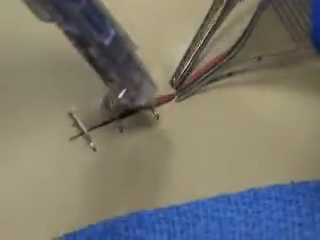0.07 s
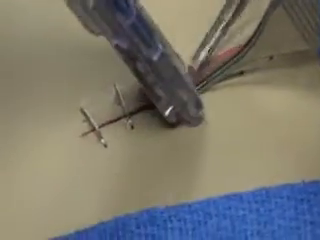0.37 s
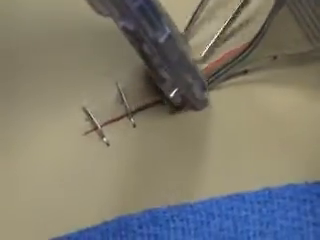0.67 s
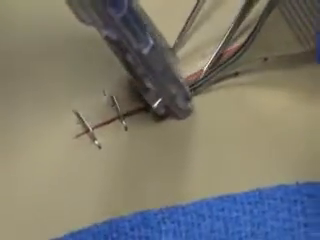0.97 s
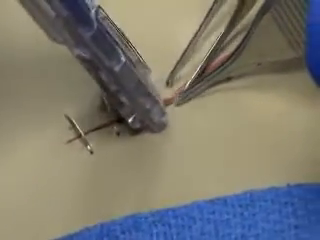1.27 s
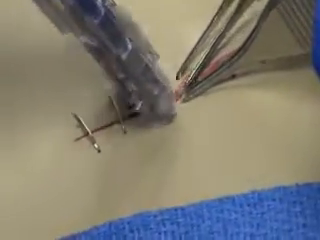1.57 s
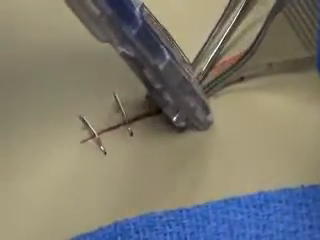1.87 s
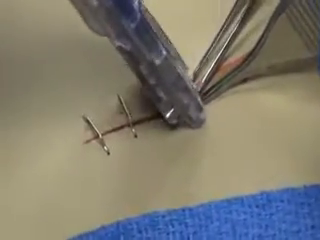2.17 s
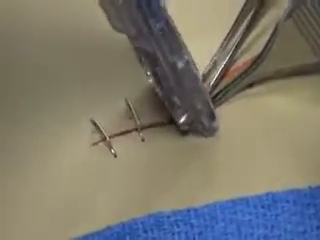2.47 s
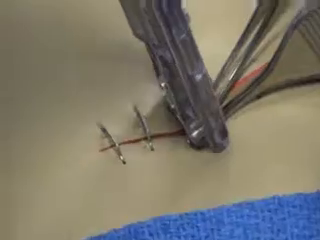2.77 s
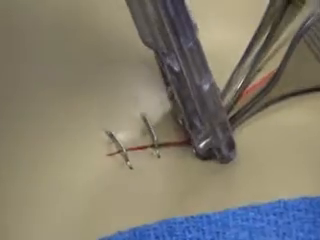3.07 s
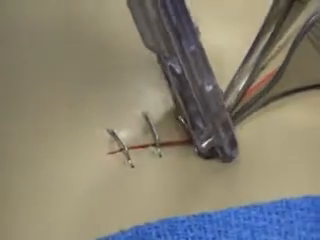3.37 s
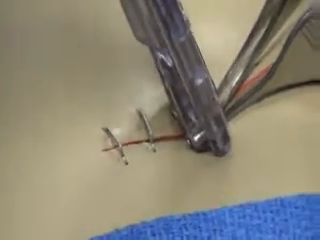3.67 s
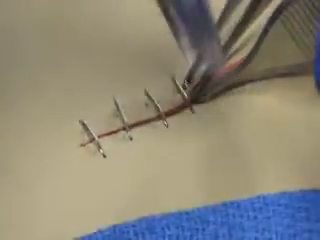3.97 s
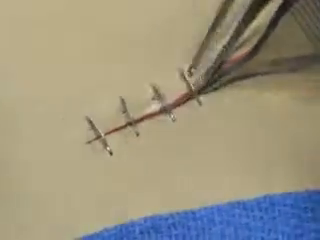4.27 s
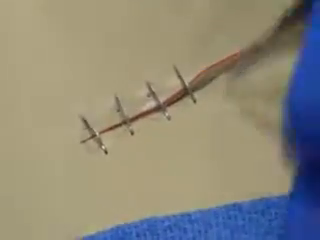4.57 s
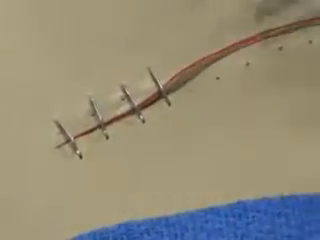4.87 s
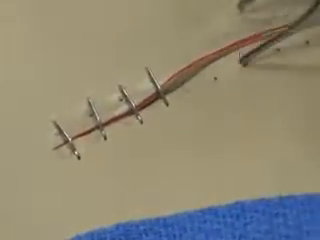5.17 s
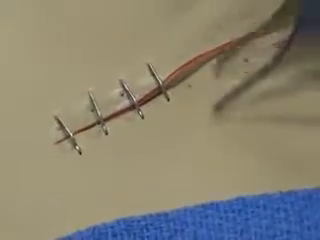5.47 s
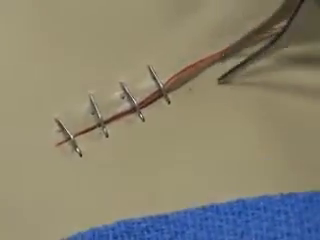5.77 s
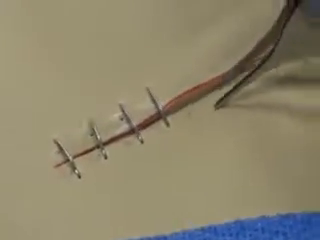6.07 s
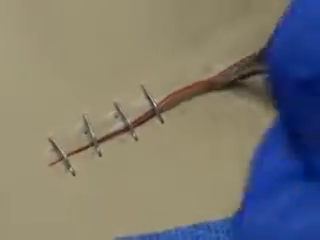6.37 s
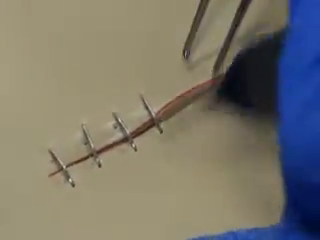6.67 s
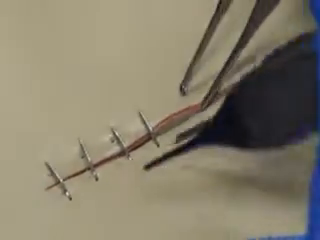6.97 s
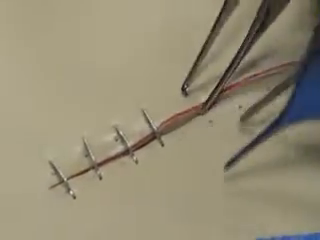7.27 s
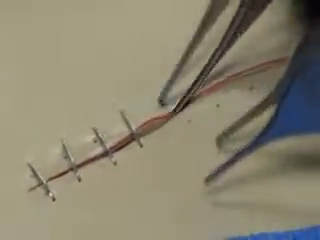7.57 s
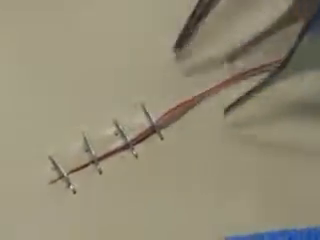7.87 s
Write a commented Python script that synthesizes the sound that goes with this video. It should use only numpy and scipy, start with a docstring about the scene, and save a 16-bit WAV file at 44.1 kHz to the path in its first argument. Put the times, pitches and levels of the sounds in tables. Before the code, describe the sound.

Close, crisp ratcheting clicks from one squeeze of a surgical stapler, followed by a single bright forceps snap, over soft ventilation noise.

```python
"""A skin stapler is squeezed once on a practice pad, close to the microphone, in a small ventilated room.
Its pawl snaps over ratchet teeth, the staple is formed, and the sprung handle slides back to its stop;
each impact excites the resonances of the plastic housing. Steel forceps tick, snap shut once and ring
in their normal modes. Gloves brush the pad with a hiss of friction, and a lens motor briefly drives a
camera's body into vibration. Under it all lie resonant air noise and the camera's steady hum."""
import sys
import numpy as np
from scipy import signal
from scipy.fft import rfft, irfft
from scipy.io import wavfile
from scipy.ndimage import uniform_filter1d

SR = 44100
rng = np.random.default_rng(int(sys.argv[2]) if len(sys.argv) > 2 else 0)


def digitize_waveform(pressure):
    """Quantize a signal to 16-bit integers and store it at the path in sys.argv[1].

    Rows of a 2-D input are taken as channels; values are limited to [-1, 1].
    """
    field = np.atleast_2d(pressure).T
    bounded = np.clip(field, -1, 1)
    quanta = np.round(bounded * 32767).astype(np.int16)
    wavfile.write(sys.argv[1], SR, quanta)


N = 348831
TIME, FREQS = np.arange(N) / SR, np.maximum(np.arange(N // 2 + 1) * SR / N, 1)
CUTOFF_HZ = 12600
ANTIPHASE = np.array([[1], [-1]])   # left, right


def from_db(db):
    """Amplitude ratio of a level in decibels."""
    return 10 ** (np.asarray(db) / 20)


def rms_one(x):
    """Normalisation to unit rms."""
    return x / np.sqrt(np.mean(x ** 2) + 1e-20)


def at_hz(points, hz):
    """Interpolation on a logarithmic frequency axis."""
    f, value = np.transpose(points)
    return np.interp(np.log(hz), np.log(f), value)


def noise(colour_db):
    """Spectral shaping of white noise, at unit rms."""
    return rms_one(irfft(rfft(rng.standard_normal(N)) * from_db(colour_db), N))


def add(out, s, sound):
    """Superposition of a short sound at time s."""
    i = int(s * SR)
    out[i:i + len(sound)] += sound[:N - i]


def gate(start, stop, attack_s, release_s):
    """Trapezoidal envelope: it rises from the start and falls after the stop."""
    return np.clip((TIME - start) / attack_s, 0, 1) * np.clip(1 - (TIME - stop) / release_s, 0, 1)


def causal(gain):
    """Causality: the minimum-phase response with these gains never precedes the blow."""
    cepstrum = irfft(np.log(gain))
    half = len(cepstrum) // 2
    return np.exp(rfft(np.r_[cepstrum[:1], 2 * cepstrum[1:half], np.zeros(half)]))


def chatter(envelope, passes=4):
    """Broadband excitation: tiny hard contacts under an envelope have a nearly flat spectrum."""
    burst = rng.standard_normal(len(envelope))
    for _ in range(passes):
        spectrum = rfft(envelope * np.sign(burst))
        burst = irfft(spectrum / (np.abs(spectrum) + 1e-12))
    return envelope * np.sign(burst)


def snap(body, focus, db, decay_ms, low_db, top_db, ring_hz=None, bounce_ms=0,
         bounce=0, rise_ms=.5, creep_db=-22, creep_ms=2.6, size=2048):
    """Stick-slip: a catch creeps, slips and chatters on a body; focus below 1 flattens the colour."""
    ms = np.arange(size) / SR * 1000 - 6   # time from the slip
    after = np.maximum(ms, 0)
    force = (1 - np.exp(-(after / rise_ms) ** 2)) * np.exp(-after / decay_ms)
    force = force / force.max() + from_db(creep_db) * np.exp(-np.abs(ms) / creep_ms)
    hz = np.maximum(np.arange(size // 2 + 1) * SR / size, 1)
    tilt = at_hz([(3000, low_db), (4800, 0), (8000, 0.0038), (10200, top_db)], hz)
    ring = 6.5 / (1 + ((hz - ring_hz) / 190) ** 2) if ring_hz else 0   # the contact point favours a pitch
    response = causal((body(hz) * from_db(tilt + ring)) ** focus)
    comb = 1 + bounce * np.exp(-2j * np.pi * hz * bounce_ms / 1000)
    spectrum = rfft(chatter(force)) * response * comb
    energy = np.sum(irfft(spectrum * (hz < CUTOFF_HZ)) ** 2)
    return from_db(db) * irfft(spectrum) * np.sqrt(.006 * SR / energy)   # db is the rms over 6 ms


def lay_snaps(rows, body, focus=1, **contact):
    """Superposition of snaps: each row is the time of the slip, then snap's arguments from db on."""
    out = np.zeros(N)
    for s, *shape in rows:
        add(out, s - .006, snap(body, focus, *shape, **contact))
    return out


def struck(hits, modes, attack_s=.0003, size=8192):
    """Free vibration: each hit sets all the damped modes of a steel part ringing."""
    t, out = np.arange(size) / SR, np.zeros(N)
    for s, db in hits:
        ringing = sum(from_db(db + level - 60 * t / t60) * np.sin(2 * np.pi * (hz * t + rng.random()))
                      for hz, level, t60 in modes)
        add(out, s, ringing * (1 - np.exp(-t / attack_s)))
    return out


# air noise and microphone hiss: f/Hz, relative level/dB
AIR_SPECTRUM = [(20, -24), (45, -9.5), (95, -7), (160, -0.5), (310, -8.5), (470, -7), (820, -16),
                (1200, -16), (1480, -28), (1900, -27), (2400, -32), (4500, -33.5), (9000, -35),
                (13000, -36)]
# duct and room resonances, plus the camera stabiliser's hum near 1.7 kHz: f/Hz, width/Hz, lift/dB
BACKGROUND_BANDS = [(147.7, 13.4, 6), (238, 26, 3.5), (271.7, 26, 4), (366.5, 16, 5.5), (556, 36, -4.5),
                    (599, 17, 3.5), (672, 48, 8.5), (733.3, 29, 9), (1110, 76, 4), (1666, 166, 6.5)]
# stereo width of the background: f/Hz, side re mid/dB
AIR_SIDE = [(40, -9), (90, -16), (180, -19), (350, -22.5), (700, -21), (1100, -31), (1450, -23), (1700, -5),
            (2100, -31), (4000, -38), (7000, -16.5), (11000, -27.5)]
# its balance: f/Hz, left re right/dB
AIR_BALANCE = [(40, -2), (90, -5), (180, -2), (350, -0.7), (700, -1.5), (1400, 1.5), (3000, 0)]

def air_and_hum(level_db=-52.5):
    """Stationary noise: air coloured by duct and room resonances, plus the camera's steady hum."""
    bands_db = sum(db * np.exp2(-(2 * (FREQS - hz) / width) ** 2) for hz, width, db in BACKGROUND_BANDS)
    mid, side = rfft(rng.standard_normal((2, N))) * from_db(at_hz(AIR_SPECTRUM, FREQS) + bands_db)
    pair = mid + ANTIPHASE * side * from_db(at_hz(AIR_SIDE, FREQS))
    balance = from_db(ANTIPHASE * at_hz(AIR_BALANCE, FREQS) / 2)   # the bass leans to the right
    return from_db(level_db) * rms_one(irfft(pair * balance, N))


# spectrum of a light contact: f/Hz, relative level/dB
TICK_SPECTRUM = [(300, -25), (1800, -13), (3000, -6), (4500, 0), (6000, -2.5), (8000, -1.5), (11500, 1)]

def ticks(rows, decay_ms=2.2, low_db=0.5):
    """Brief contacts radiate broadband clicks; the rows are t/s, level/dB, treble/dB."""
    snaps = [(s, db, decay_ms, low_db, top_db) for s, db, top_db in rows]
    return lay_snaps(snaps, lambda hz: from_db(at_hz(TICK_SPECTRUM, hz)))


# light touches of the tools: t/s, level/dB, treble/dB
TOUCHES = [(.422, -54.5, 3.5), (1.272, -65, -8), (2.801, -60.5, -3), (4.579, -54, -6), (5.0654, -58, 1),
           (6.3356, -62, -2)]

def tool_touches():
    """Light impacts make the tools tick."""
    return ticks(TOUCHES)


def faint_touches(per_s=.8, level_db=-70, top_db=-3):
    """A Poisson process: the handled tools tick, barely audibly, at random moments."""
    times = TIME[rng.random(N) < per_s / SR]
    return ticks([(s, level_db, top_db) for s in times if s > .01])


# slips of the return spring: t/s, ping level/dB, tick level/dB
SPRING_SLIPS = [(2.7894, -38.5, -64), (3.7495, -40, -53), (3.7937, -41, -58), (3.8573, -36, -57)]
# its modes: f/Hz, relative level/dB, T60/s
SPRING_MODES = [(3060, -4, 0.018), (3220, -15, 0.066), (2850, -10, 0.025)]

def return_spring(top_db=-12):
    """Impulse excitation: the spring shifts on its seat, ticks and rings in its modes."""
    pings = struck([(s, ping_db) for s, ping_db, _ in SPRING_SLIPS], SPRING_MODES)
    return pings + ticks([(s, tick_db, top_db) for s, _, tick_db in SPRING_SLIPS])


# resonances of the stapler's housing: f/Hz, width/Hz, level/dB
HOUSING_MODES = [(3250, 220, -5.5), (4840, 310, -1.5), (5660, 60, -2.5), (6400, 190, -6), (7100, 1050, -2),
                 (7800, 110, 0), (8120, 91, -2), (9300, 240, -7), (9970, 110, 1), (10330, 130, -7),
                 (10800, 470, 2.5), (11560, 130, 0), (11940, 240, -0.5), (12440, 170, -2)]
# its broad response beneath them: f/Hz, level/dB
SHELL_RESPONSE = [(40, -40), (200, -16.5), (500, -20.5), (1100, -18), (1500, -25), (1850, -12), (2300, -16),
                  (3000, -10.5), (3900, -10), (6000, -6.5), (8000, -3.5), (8800, -12), (10500, -18),
                  (13000, -11)]

def housing(hz, vary_db=0.5, detune=0.013):
    """Frequency response of the housing: each contact and grip excites and shifts its modes anew."""
    power = from_db(at_hz(SHELL_RESPONSE, hz)) ** 2
    for centre, width, db in HOUSING_MODES:
        shift, strength = rng.standard_normal(2)
        offset = (hz - centre * (1 + detune * shift)) / (width / 2)
        power = power + from_db(db + vary_db * strength) ** 2 / (1 + offset ** 2 / 2) ** 2
    return np.sqrt(power)


# the pawl drops over each tooth: t/s, level/dB, ring f/Hz, bounce delay/ms
RATCHET_TEETH = [(3.0267, -30, 5000, 1.1), (3.049, -29, 6500, 1.068), (3.0661, -27, 6000, 0.88),
                 (3.081, -25.5, 5580, 0.74), (3.1198, -24.5, 4870, .892), (3.2216, -26, 4800, .67),
                 (3.3244, -25.5, 7350, 0.496), (3.408, -25, 5860, 1.25), (3.4597, -26.3, 10600, 0.51)]

def ratchet(focus, low_db=-1, bounce=0.46):
    """Comb filtering: each snap of the pawl interferes with its own bounce and sounds hollow."""
    # the load grows tooth by tooth, so the snaps get shorter and brighter
    decays_ms = np.linspace(2.8, 1.6, len(RATCHET_TEETH))
    tops_db = np.linspace(-1, 2.5, len(RATCHET_TEETH))
    rows = [(s, db, decay, low_db, top, ring_hz, bounce_ms)
            for (s, db, ring_hz, bounce_ms), decay, top in zip(RATCHET_TEETH, decays_ms, tops_db)]
    return lay_snaps(rows, housing, focus, bounce=bounce * focus, rise_ms=.55, creep_db=-19.5, creep_ms=2.4)


# the staple is formed, then returning parts hit their stops: t/s, level/dB, decay/ms, ring f/Hz
KNOCKS = [(3.4627, -27, 2.4, 11000), (3.4675, -31, 3.4, 3300), (3.8573, -43, 0.71, 2690),
          (3.879, -39, 0.84, 7300), (3.9213, -47, 2.4, 7410), (3.9282, -46, 1.1, 4870),
          (3.9404, -31, 4.5, 7400), (3.9456, -35.5, 6, 7700), (3.9523, -27.5, 0.44, 9550)]

def knocks(focus, reference_db=-30):
    """Impacts on the housing: the harder the blow, the brighter its spectrum."""
    rows = []
    for s, db, decay_ms, ring_hz in KNOCKS:
        excess_db = db - reference_db
        low_db, top_db = 6 - 0.3 * excess_db, 4 + 0.2 * excess_db
        rows.append((s, db, decay_ms, low_db, top_db, ring_hz))
    return lay_snaps(rows, housing, focus, rise_ms=0.61)


# rasp of the handle: f/Hz, relative level/dB
SLIDE_SPECTRUM = [(600, -14), (1500, 1), (3000, -2), (5500, -3), (8000, 5), (9800, -7), (12000, -2.5)]

def handle_slide(level_db=-47.5, grain_db=4.5):
    """Sliding friction: the released handle rasps as it speeds up, runs evenly and stops."""
    grains = from_db(grain_db * rms_one(uniform_filter1d(rng.standard_normal(N), size=90)))
    motion = gate(start=3.853, stop=3.938, attack_s=0.026, release_s=.028)
    return from_db(level_db) * motion * rms_one(grains * noise(at_hz(SLIDE_SPECTRUM, FREQS)))


def bend(x, lag_s=0.000997, fast_hz=9000):
    """Dispersion: low bending waves cross the plastic shell more slowly, so each snap sweeps down."""
    lag_cycles = lag_s * (2 * np.sqrt(fast_hz * FREQS) - FREQS)
    return irfft(rfft(x) * np.exp(-2j * np.pi * lag_cycles), N)


def stapler(snap_db=0.37, spread_focus=0.48):
    """Directivity: the direct sound, and the less coloured sound that all faces send into the room."""
    slide, spring = handle_slide(), return_spring()
    return [from_db(snap_db) * bend(ratchet(focus) + knocks(focus)) + slide + spring
            for focus in (1, spread_focus)]


# the forceps' tips meet: t/s, level/dB
FORCEPS_HITS = [(4.9873, -14)]
# their modes: f/Hz, relative level/dB, T60/s
FORCEPS_MODES = [(720, -28, .03), (1780, -36, .09), (2396, -42, .08), (3200, -34, .02), (4610, -24, .05),
                 (6400, -21, .04), (6600, -23, .04), (6820, -19, .03), (7042, -21.5, .08),
                 (7697, -15.5, .07), (9250, -19, .025), (11050, -16, .015), (11380, -13, .025),
                 (12050, -12, .05), (12230, -12, .025)]
# the crack of steel on steel: f/Hz, relative level/dB
CRACK_SPECTRUM = [(60, -43), (800, -22), (2000, -21.5), (3800, -24), (4700, -2.5), (5600, -11.5), (7000, 1),
                  (7700, -3), (8200, -13), (9300, -2), (10600, -10), (12200, 6)]

def forceps(crack_db=-26, decay_ms=.6, top_db=2):
    """Hard impact: the tips close with a broadband crack, then ring in their normal modes."""
    rows = [(s, crack_db, decay_ms, 0, top_db) for s, _ in FORCEPS_HITS]
    crack = lay_snaps(rows, lambda hz: from_db(at_hz(CRACK_SPECTRUM, hz)), rise_ms=0.19, creep_db=-24)
    return crack + struck(FORCEPS_HITS, FORCEPS_MODES)


# strokes of a glove on the pad: peak t/s, level/dB, half length/s
GLOVE_STROKES = [(5.58, -62, .085), (6.25, -70, 0.2), (6.64, -64, 0.15), (7.252, -68.5, .04),
                 (7.875, -65.5, .035)]
# their hiss: f/Hz, relative level/dB
GLOVE_SPECTRUM = [(600, -20), (1700, 1.5), (3000, 0), (5000, -3), (8000, -1.5), (12000, -2)]

def gloves():
    """Friction noise swells and fades with each stroke."""
    rubbing = sum(from_db(db) * np.exp(-((TIME - s) / half_s) ** 2) for s, db, half_s in GLOVE_STROKES)
    return rubbing * noise(at_hz(GLOVE_SPECTRUM, FREQS))


# the lens refocuses: start t/s, stop t/s, level at the top of a step/dB
LENS_RUNS = [(5.51, 5.6, -62), (5.886, 6.72, -64)]

def lens_motor(step_hz=30.0, step_at_s=6.215, ring_hz=1690, width_hz=130, ramp_s=0.024,
               sharpness=2.9, rough=.35, skew_rad=0.49):
    """Forced vibration: each step rings the camera body, shaking the two microphones out of phase."""
    running = sum(from_db(db) * gate(start, stop, ramp_s, ramp_s) for start, stop, db in LENS_RUNS)
    steps = np.exp(sharpness * (np.cos(2 * np.pi * step_hz * (TIME - step_at_s)) - 1))
    ring = np.sqrt(2) * np.sin(2 * np.pi * ring_hz * TIME + skew_rad * ANTIPHASE)
    rasp = noise(-20 * np.log10(1 + ((FREQS - ring_hz) / width_hz) ** 2))
    return running * steps * (ring + rough * rasp)


# reverberation time of the room: f/Hz, T60/s
ROOM_T60 = [(500, 1), (3000, 0.4), (6000, 0.48), (12000, 0.24)]

def room(x, near_db=-15, near_t60=0.071, far_db=-16, gap_s=0.0032, side_db=-25, bands=8):
    """Reverberation: early scatter from the table and people, then a tail, shorter in the treble."""
    t = TIME[:SR * 2 // 3]
    edges, tail = np.geomspace(400, 16000, bands + 1), 0
    for low, high in zip(edges, edges[1:]):
        bandpass = signal.butter(2, [low, high], "band", fs=SR, output="sos")
        band = signal.sosfilt(bandpass, rng.standard_normal((2, len(t))))
        tail = tail + band * from_db(-60 * t / at_hz(ROOM_T60, np.sqrt(low * high)))
    near = rng.standard_normal((2, len(t))) * from_db(-60 * t / near_t60)
    build = 1 - np.exp(-(t / gap_s) ** 2)
    response = from_db(near_db) * rms_one(near * build) + from_db(far_db) * rms_one(tail * build)
    mid, side = signal.fftconvolve(x[None], response / np.sqrt(len(t)), axes=1)[:, :N]
    return mid + from_db(side_db) * side * ANTIPHASE


def scene(tools_room_db=-5):
    """Superposition of the direct sound, the reverberant field and the background."""
    direct, spread = stapler()
    tools = forceps() + tool_touches()
    reverberant = room(spread + from_db(tools_room_db) * tools)
    return direct + tools + reverberant + gloves() + lens_motor() + air_and_hum() + faint_touches()


def record(dry):
    """Band limiting: a steep elliptic low-pass removes the highest treble."""
    return signal.sosfilt(signal.ellip(10, .2, 75, CUTOFF_HZ, fs=SR, output="sos"), dry)


dry = scene()
out = record(dry)
digitize_waveform(out)
```